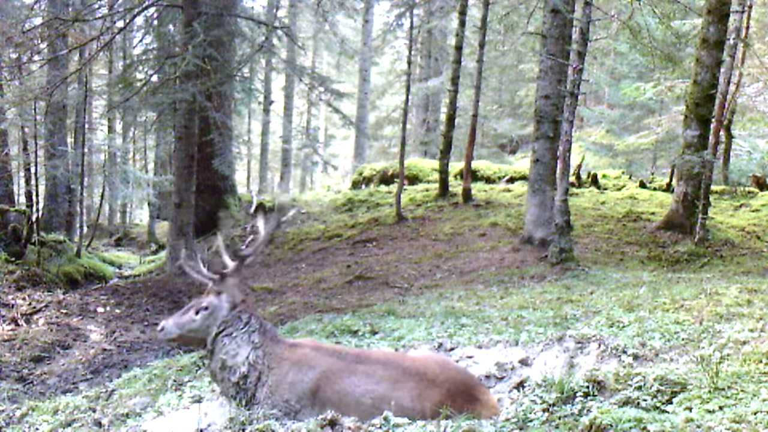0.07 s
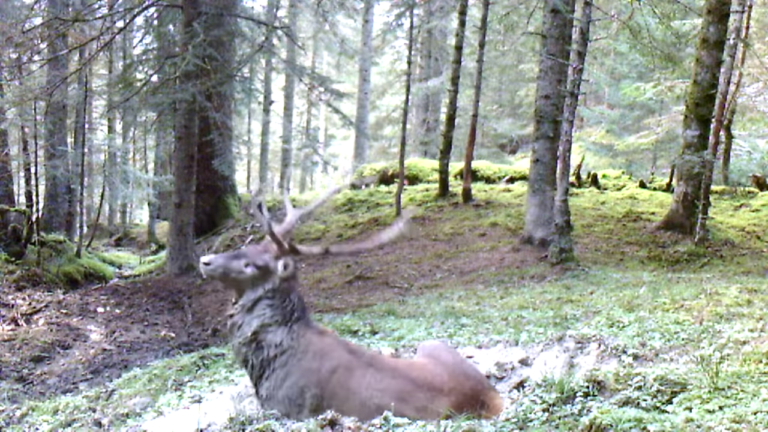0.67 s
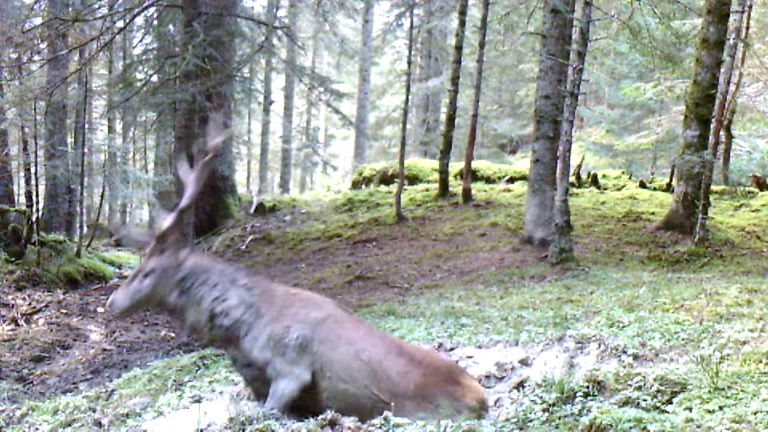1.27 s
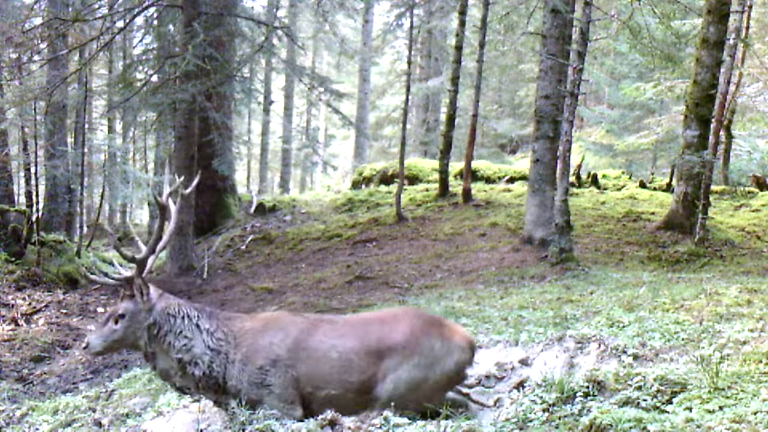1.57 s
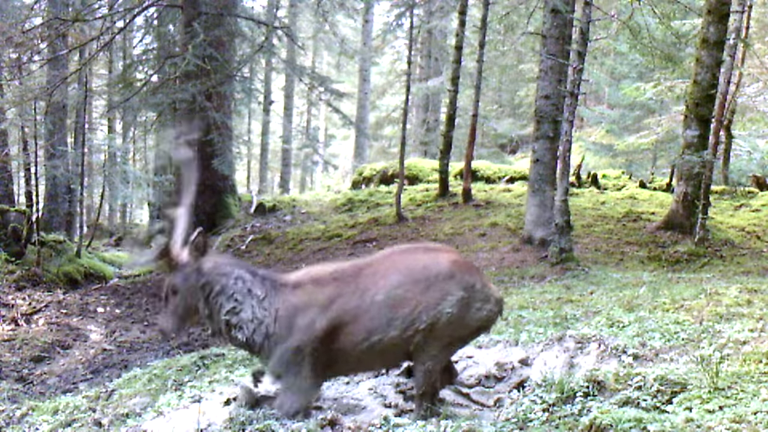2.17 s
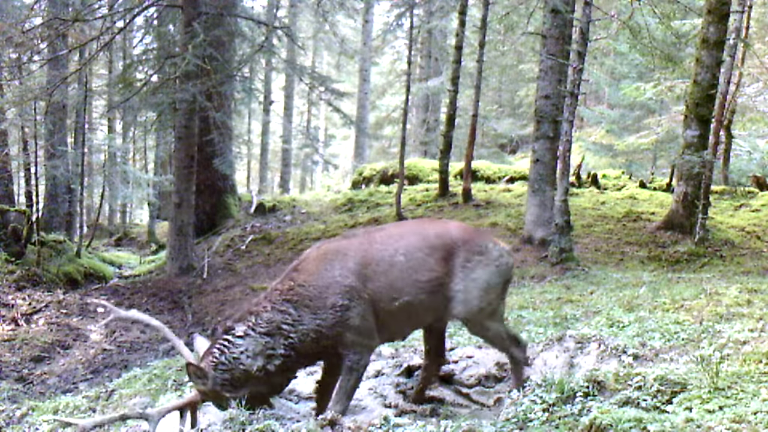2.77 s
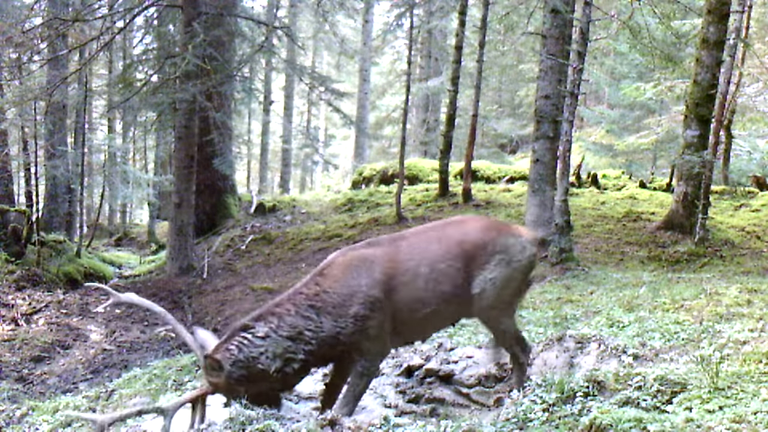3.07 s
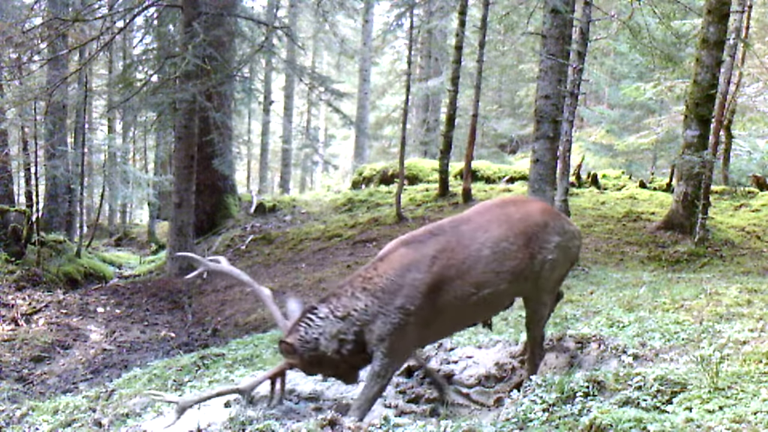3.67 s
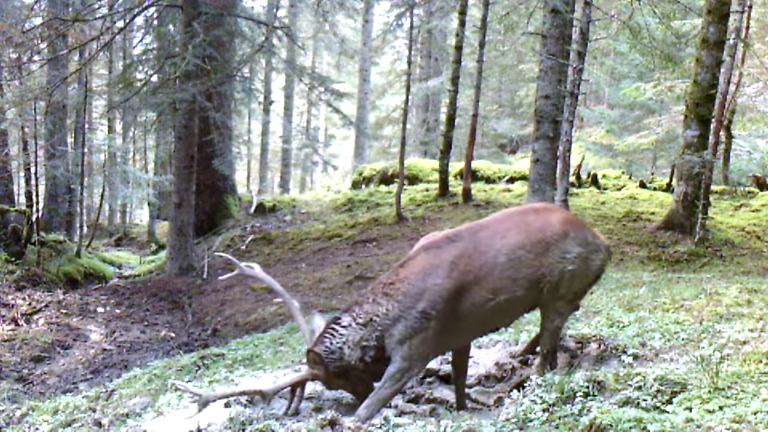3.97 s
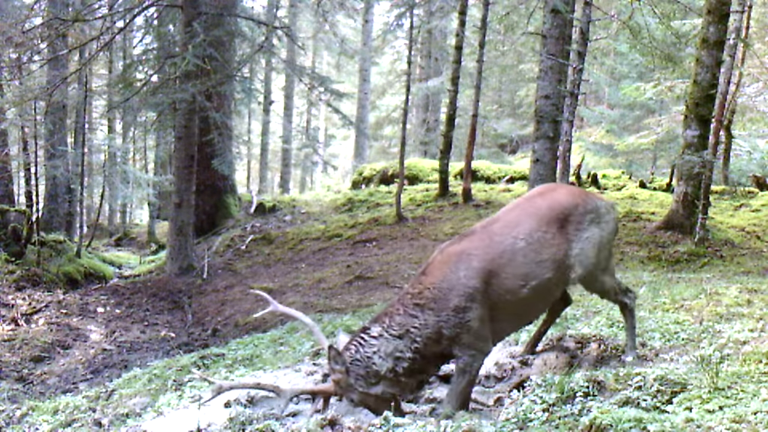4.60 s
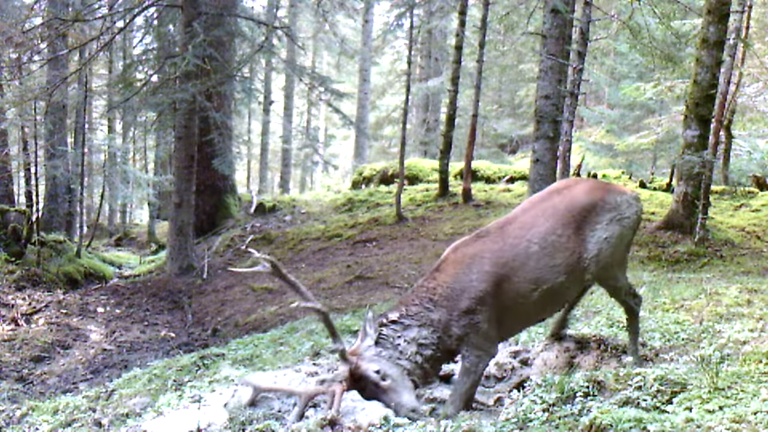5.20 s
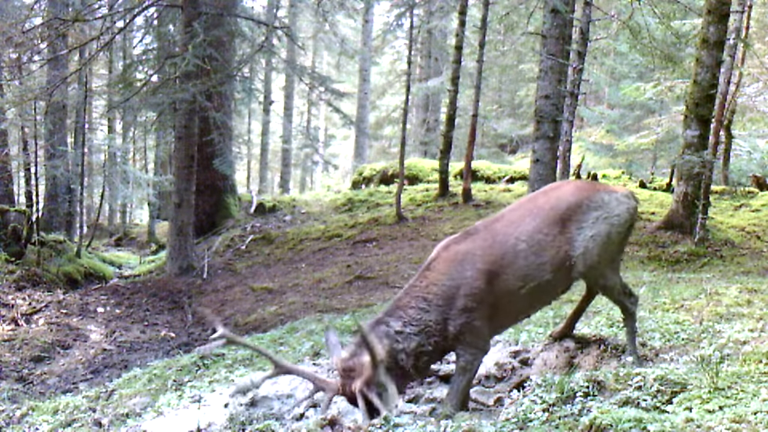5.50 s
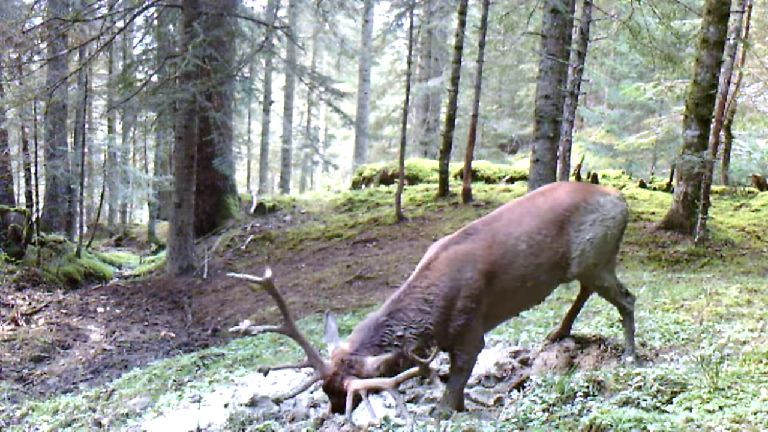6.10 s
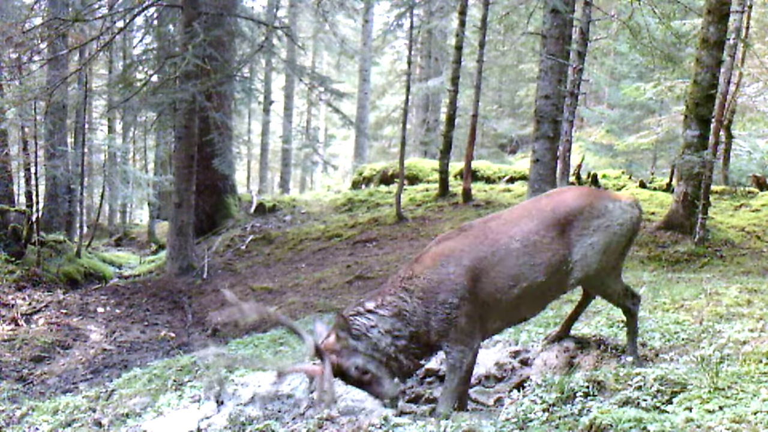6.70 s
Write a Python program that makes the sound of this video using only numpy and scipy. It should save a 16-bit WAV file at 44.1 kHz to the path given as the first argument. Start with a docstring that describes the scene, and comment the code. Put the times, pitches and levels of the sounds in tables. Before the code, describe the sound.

A stag splashes and squelches in a muddy wallow, with wet pops, drips and soft thuds over a steady hiss.

```python
"""Wet slurry rustles and drips over a steady hiss; then a stag heaves itself out of a mud wallow and
rakes it with antlers and forelegs. Trapped air resonates: swarms of tiny bubbles squelch, single
pockets pop, and legs thud into gulping holes. Ground and trunks scatter the sound of the mud, and
something rings faintly far off, perhaps a cowbell."""
import sys
import numpy as np
from scipy import signal
from scipy.fft import rfft, irfft, next_fast_len
from scipy.io import wavfile

SR = 44100
rng = np.random.default_rng(int(sys.argv[2]) if len(sys.argv) > 2 else 0)


def unload_wav(signal):
    """Save mono or channel-first audio to the path in sys.argv[1] as 16-bit WAV at rate SR, clipped to [-1, 1]."""
    wavfile.write(
        sys.argv[1],
        SR,
        np.round(np.clip(np.atleast_2d(signal).T, -1, 1) * 32767).astype(np.int16),
    )


N = 302085
TIME = np.arange(N) / SR


def undb(db):
    """Amplitude ratio of a level in decibels."""
    return 10 ** (np.asarray(db) / 20)


def unit(x):
    """Normalisation to an rms of 1."""
    return x / np.sqrt(np.mean(x ** 2) + 1e-18)


def add(out, start, sound):
    """Superposition: a sound joins the mix at start seconds."""
    i = min(max(int(start * SR), 0), len(out))
    out[i:i + len(sound)] += sound[:len(out) - i]


def colour(x, points):
    """Minimum-phase filtering through points of (frequency [Hz], gain [dB])."""
    size = 2 * next_fast_len(len(x) // 2 + 2048)
    hz, db = np.transpose(points)
    bin_hz = np.arange(size // 2 + 1) * SR / size
    gain = undb(np.interp(np.log(bin_hz + 1), np.log(hz), db))
    cepstrum = irfft(np.log(gain))
    cepstrum[1:size // 2] *= 2  # folding onto positive time makes the filter causal
    cepstrum[size // 2 + 1:] = 0
    return irfft(rfft(x, size) * np.exp(rfft(cepstrum)))[:len(x)]


def fade(t, t60):
    """Exponential damping, 60 dB down after t60 seconds."""
    return np.exp(-np.log(1000) * t / max(t60, 1e-4))


def linger(x, t60):
    """Leaky integration of power: a running rms that dies away in t60 seconds."""
    retained = fade(2 / SR, t60)
    return np.sqrt(signal.lfilter([1 - retained], [1, -retained], x ** 2 + 1e-18))


def bubble(t, hz, t60, glide):
    """Damped resonance of a cavity, whose pitch rises as it opens."""
    return np.sin(2 * np.pi * hz * t * (1 + glide * np.minimum(t / t60, 1) / 2)) * fade(t, t60)


def swarm(per_second, low_hz, high_hz, cycles, spread_db):
    """Incoherent sum of tiny bubbles bursting at random: most weak, a few strong."""
    out = np.zeros(N)
    draws = np.random.default_rng(rng.integers(2 ** 31)).random((int(per_second * N / SR) + 2, 4))
    for when, pitch, life, rank in draws:
        hz = low_hz * (high_hz / low_hz) ** pitch
        t60 = cycles * 2 ** (2 * life - 1) / hz
        gain = undb(-spread_db * np.log(rank + 0.0069)) * np.sqrt(hz / t60)
        polarity = (-1) ** int(when * N)
        t = np.arange(int(t60 * SR) + 2) / SR
        add(out, when * N / SR, polarity * gain * bubble(t, hz, t60, glide=0.058))
    return unit(out)


def hiss(level_db=-43):
    """Stationary filtered noise: a steady distant rush and hiss."""
    # noise spectrum: (frequency [Hz], relative density [dB])
    hiss_spectrum = [(20, 8.5), (30, -10), (60, -5), (130, -6), (250, -5.5), (400, -7), (520, -6),
                     (720, -12.5), (900, -13), (1300, -12), (1650, -15.5), (2300, -15), (5000, -16),
                     (6000, -27)]
    return undb(level_db) * unit(colour(rng.standard_normal(N), hiss_spectrum))


def slurry_flow(strokes, stir_db=-4, creep_db=-19.5, fallback_db=-12.5):
    """Independent motions add in power: stirring, creep before a stroke and mud falling back after."""
    # stirring between the strokes: (time [s], level [dB])
    stirring = [(0.0, -48.5), (0.42, -40), (0.88, -47.5), (1.05, -40), (1.35, -45.5), (2.56, -37.5),
                (2.84, -43), (3.13, -37.5), (3.24, -41.5), (4.31, -36), (4.54, -49.5), (4.77, -36),
                (4.92, -35.5), (5.47, -42), (6.05, -38.5), (6.68, -33.5), (6.81, -28), (6.85, -11)]
    stirred = undb(np.interp(TIME, *np.transpose(stirring)) + stir_db)
    throw_power = 0.82  # a harder stroke moves more mud, but less than in proportion
    creep = undb(creep_db) * linger(strokes[::-1], t60=0.13)[::-1] ** throw_power
    fallback = undb(fallback_db) * linger(strokes, t60=0.37) ** throw_power
    return np.sqrt(stirred ** 2 + creep ** 2 + fallback ** 2)


def slurry(flow, gain_db=-3, wash_db=-5):
    """Overlapping bubble resonances and noise merge into a rustle proportional to the flow."""
    # timbre of moving slurry: (frequency [Hz], gain [dB])
    slurry_spectrum = [(80, -34.5), (400, 1), (750, -6), (1100, -3.5), (1550, 3), (2300, -2.5), (3100, 3),
                       (3800, 0.5), (4700, 3.5), (6000, -4.5)]
    drops = swarm(per_second=1800, low_hz=700, high_hz=6000, cycles=30, spread_db=3)
    wash = undb(wash_db) * rng.standard_normal(N)
    return unit(colour(drops + wash, slurry_spectrum)) * flow * undb(gain_db)


def pops(pockets, rise_s=0.00047):
    """Impulsive excitation: air pockets tear open and ring; small ones splatter, large ones plop."""
    out, t = np.zeros(N), np.arange(SR // 16) / SR
    for start, db, hz, t60 in pockets:
        band = signal.butter(3, [min(hz * .6, 1700), min(hz * 2.2, 6000)], "band", fs=SR, output="sos")
        splat = unit(signal.sosfilt(band, rng.standard_normal(len(t))))
        decay = fade(t, t60)
        droplets = (hz / 3000) ** 1.5 * splat * decay
        pop = (bubble(t, hz * .97, t60, glide=.16) + droplets) * np.minimum(t / rise_s, 1)
        # the energy released grows with the level and the length of the ring
        add(out, start, undb(db) * unit(pop) * np.std(decay) / 2)
    return out


def drips(flow, count=150, above_flow_db=12.5, spread_db=2.5, centre_hz=2610, octaves=.45, t60=0.015):
    """Brief resonances of drops and small pockets tick at random, louder when more slurry moves."""
    times = (np.arange(count) + rng.random(count)) * N / SR / count
    strength, pitch = np.clip(rng.standard_normal((count, 2)), -2, 2).T
    db = 20 * np.log10(np.interp(times, TIME, flow)) + above_flow_db + spread_db * strength
    hz = centre_hz * 2 ** (octaves * pitch)
    return pops(zip(times, db, hz, np.full(count, t60)))


def forest(x, ground_t60=0.36, trunks_t60=0.62, echo_db=-14):
    """Scattering by ground and trunks: a filtered copy of the sound with a thin reverberant tail."""
    # response of the scattering paths: (frequency [Hz], gain [dB])
    scatter_spectrum = [(60, -7.5), (400, -2.5), (750, -13.5), (1500, -10.5), (3000, -21), (5000, -6.5)]
    out, t = x.copy(), np.arange(SR) / SR
    block = SR // 8
    # every splash happens at another spot, so each block's echoes take other paths
    for i in range(0, N, block):
        near, far = rng.standard_normal((2, SR))
        ground = unit(near * fade(t, ground_t60) * (t > .003))
        trunks = unit(far * fade(t, trunks_t60) * np.minimum(t / 0.015, 1))
        echo = undb(echo_db) * (ground + trunks) / np.sqrt(SR)
        add(out, i / SR, signal.fftconvolve(x[i:i + block], echo))
    return colour(out, scatter_spectrum)


def air_pockets():
    """Cavity resonance: the loudest pockets of trapped air burst one by one."""
    # bursts: (time [s], level [dB], nominal pitch [Hz], t60 [s])
    bursts = [(0.4987, -26.5, 2720, .013), (0.629, -22.5, 2700, 0.01), (0.67, -21, 2700, 0.0057),
              (0.8693, -21, 4030, 0.015), (1.0113, -22.5, 1490, 0.035), (1.0466, -23, 1950, 0.03),
              (1.071, -24.5, 1370, 0.037), (1.1519, -1, 4600, 0.0083), (1.1733, -19.5, 3080, 0.028),
              (1.5273, -21, 2870, 0.021), (1.5541, -16, 2210, 0.0098), (1.7416, -12.5, 3470, 0.017),
              (1.9968, -12.5, 2760, 0.043), (2.0337, -3, 3070, 0.05), (2.207, -13, 4300, 0.026),
              (2.263, -14, 4310, 0.052), (2.3367, -7, 3000, 0.0078), (2.3777, -14.5, 3730, 0.015),
              (2.5013, -16.5, 1545, 0.018), (2.5816, 1, 4830, 0.028), (3.0004, -14.5, 3550, 0.0064),
              (3.2756, -17.5, 5000, 0.028), (3.544, -9.5, 3260, 0.011), (3.5702, -4.5, 4440, .024),
              (3.689, -21.5, 4330, 0.035), (3.798, -21, 2430, .02), (3.8442, -3, 2100, 0.003),
              (4.1259, -3.5, 1770, 0.01), (4.1468, -4, 1488, .039), (4.4376, -17.5, 4840, 0.04),
              (4.491, -17.5, 3100, 0.032), (4.789, -15, 2970, 0.011), (4.9134, -5, 2630, 0.022),
              (4.96, -21, 3560, 0.054), (5.004, -21, 2660, 0.034), (5.028, -20.5, 2020, 0.017),
              (5.308, -15.5, 4820, 0.04), (5.3744, -15, 1820, 0.028), (5.4548, -24.5, 1840, 0.045),
              (5.6807, -21.5, 2930, 0.037), (5.7535, -8, 1880, 0.0083), (6.0033, -19.5, 3420, 0.02),
              (6.1318, -9, 2780, .004), (6.1393, -13, 2470, 0.019), (6.163, -14, 2420, 0.011),
              (6.2183, -20, 4660, 0.018), (6.4219, 6.5, 3030, 0.004), (6.611, -7.5, 4670, 0.016),
              (6.6895, -5, 4380, 0.033), (6.734, -14, 2820, 0.036), (6.7537, 3.5, 3300, 0.0071),
              (6.841, -5, 2020, 0.0098)]
    return pops(bursts)


def squelches(gain_db=-1, hollow_q=4.0, bypass_db=-7):
    """Stick-slip flow: pressure under a leg or antler forces air and water through the mud in jerks."""
    # mud pressed or torn: (time [s], duration [s], level [dB], relative spray [dB], hollow [Hz])
    presses = [(0.828, 0.073, -42.5, 4, 1420), (0.928, .032, -42, 2, 1650), (1.128, .032, -40.5, 3, 1820),
               (1.716, 0.042, -33.5, 8, 1900), (1.757, 0.033, -29, -2.5, 2230),
               (1.943, 0.019, -33, 4, 1180), (2.011, 0.031, -25.5, 0.5, 1400),
               (2.306, 0.065, -36, -0.5, 1630), (2.431, 0.05, -37.5, -2, 1850),
               (2.571, 0.022, -30, 3, 2000), (2.76, 0.036, -38.5, 1.5, 1840), (3.128, 0.02, -44, 10, 1840),
               (3.294, 0.037, -21.5, -6, 1250), (3.533, 0.024, -46, 13.5, 2200),
               (3.839, 0.017, -22.5, -4.5, 1420), (4.016, 0.093, -46.5, 13, 1600),
               (4.108, 0.034, -27, 3.5, 1990), (4.146, .016, -20.5, -9, 1570),
               (4.362, 0.043, -31.5, 2.5, 1600), (4.464, 0.021, -24.5, 1.5, 1600),
               (4.837, 0.012, -29, -7, 1410), (5.075, 0.0367, -38, 6, 1770), (5.363, 0.027, -38, 2, 1820),
               (5.791, 0.054, -34.5, -2, 1540), (6.082, 0.074, -37, 0.5, 2020),
               (6.4, 0.0293, -27.5, 0.5, 1590), (6.598, 0.0085, -18.5, 2.5, 1330),
               (6.661, 0.059, -38.5, 10, 2100), (6.757, 0.011, -18, 2, 1710),
               (6.771, 0.029, -26.5, 4, 1740), (6.805, 0.0247, -16.5, 0.5, 1580)]
    # timbre of the coarse bubbles: (frequency [Hz], gain [dB])
    body_spectrum = [(80, -13), (300, 1), (700, -11), (1000, -4), (1450, -4.5), (2100, -3), (3000, -14.5),
                     (5000, -27.5)]
    # timbre of the fine spray: (frequency [Hz], gain [dB])
    spray_spectrum = [(900, -32), (1900, -17.5), (2900, 5.5), (3800, 1), (4700, 5), (6000, -8.5)]
    coarse = swarm(per_second=1900, low_hz=400, high_hz=3500, cycles=22, spread_db=2.7)
    fine = swarm(per_second=3200, low_hz=1800, high_hz=6500, cycles=24, spread_db=3)
    body, spray = colour(coarse, body_spectrum), colour(fine, spray_spectrum)
    slip_times = np.linspace(0, N / SR, N // 150)  # a few milliseconds apart
    slips = undb(1.8 * np.interp(TIME, slip_times, rng.standard_normal(len(slip_times))))
    out = np.zeros(N)
    for start, length, db, spray_db, hollow_hz in presses:
        span = slice(int(start * SR), min(int((start + length) * SR) + SR // 600, N))
        progress = np.linspace(0, 1, span.stop - span.start)
        push = slips[span] * np.interp(progress, [0, .05, .5, .85, 1], [0, .65, 1, .6, 0])
        # the hollow in the mud gives each squelch a formant, which falls as the hollow widens
        formant = signal.lfilter(*signal.iirpeak(hollow_hz, hollow_q, fs=SR), body[span])
        vowel = formant + undb(bypass_db) * body[span]
        falling = np.interp(progress * (1 + .14 * (1 - progress)), progress, vowel)
        squelch = unit(push * falling) + undb(spray_db) * unit(push * spray[span])
        add(out, start, undb(db + gain_db) * squelch)
    return out


def thuds(rise_s=0.0016, gulp_db=-4.5, slosh_db=-6, ground_db=2, ground_hz=130):
    """Impact and cavity resonance: a leg plunges, its hole gulps, mud sloshes, soft ground thumps."""
    # legs and body plunging: (time [s], level [dB], cavity [Hz], thump level [dB], slosh t60 [s])
    plunges = [(0.843, -20, 256, -34, 0.18), (0.998, -22.5, 299, -41, 0.075), (1.172, -18, 340, -45, 0.027),
               (1.552, -13.5, 530, -48, 0.056), (1.688, -23, 248, -47, .04), (1.74, -24, 497, -41, 0.051),
               (1.769, -10, 409, -36, 0.1), (2.034, -11, 268, -31, 0.091), (2.335, -24, 362, -42, 0.1),
               (2.397, -25.5, 210, -34, 0.15), (2.425, -25, 280, -31.5, 0.28),
               (2.581, -25, 328, -44, 0.097), (2.62, -25, 306, -34.5, 0.074), (2.766, -24, 416, -38, .12),
               (3.303, -21.5, 287, -28, 0.18), (3.535, -19.5, 205, -33, 0.077),
               (3.794, -20.5, 450, -34.5, 0.21), (3.844, -19.5, 210, -44.5, 0.12),
               (4.117, -24, 190, -41.5, 0.092), (4.146, -16.5, 199, -31.5, 0.14),
               (4.39, -23.5, 420, -30.5, .1), (4.469, -18, 380, -45, 0.035), (4.842, -23, 250, -59, 0.099),
               (4.891, -22.5, 330, -58, 0.079), (5.375, -28, 278, -44, .05), (5.75, -19, 300, -35.5, 0.11),
               (5.819, -22, 303, -38, 0.093), (6.597, -26, 266, -48, 0.037), (6.756, -22, 320, -31, 0.092),
               (6.796, -12, 350, -41, 0.077), (6.815, -8, 333, -43, 0.076)]
    gulp_t60, gulp_gap_s, pitch_ratio = 0.029, .015, .86
    out, t = np.zeros(N), np.arange(SR // 7) / SR
    slosh_band = signal.butter(3, [120, 520], "band", fs=SR, output="sos")
    attack = np.minimum(t / rise_s, 1)
    for start, db, hz, thump_db, slosh_t60 in plunges:
        gain = undb(db + gulp_db)
        slosh = unit(signal.sosfilt(slosh_band, rng.standard_normal(len(t)))) * fade(t, slosh_t60)
        gulp = bubble(t, hz, gulp_t60, glide=0.08) + undb(slosh_db) * slosh
        thump = bubble(t, ground_hz * np.exp(0.1 * rng.standard_normal()), t60=0.062, glide=0)
        add(out, start, (gain * gulp + undb(thump_db + ground_db) * thump) * attack)
        for k in (1, 2):  # each further gulp is lower in pitch and fades with the slosh
            delay = gulp_gap_s * (k + rng.uniform(-.25, .25))
            after_gulp = bubble(t, hz * pitch_ratio ** k, gulp_t60, glide=.12) * attack
            add(out, start + delay, gain * fade(delay, slosh_t60) * after_gulp)
    return out


def far_bell(rise_s=0.0052):
    """Modal vibration: a few soft strokes ring out, their attack blurred by distance."""
    # strokes of the bell: (time [s], level [dB])
    strikes = [(2.915, -52.5), (3.541, -53.5), (4.833, -55), (5.488, -56.5)]
    # its modes: (frequency [Hz], relative level [dB], t60 [s])
    bell_modes = [(463, 4, 1.6), (1004, 6, 1.75), (1000, -21.5, 1.0), (1640, -25, .7)]
    ring = sum(undb(db) * np.sin(2 * np.pi * hz * TIME) * fade(TIME, t60) for hz, db, t60 in bell_modes)
    out = np.zeros(N)
    for start, db in strikes:
        add(out, start, undb(db) * ring * np.minimum(TIME / rise_s, 1))
    return out


def scene():
    """Superposition, in mono, of the wallow, its scattered sound, the bell and the hiss."""
    strokes = squelches() + air_pockets()
    flow = slurry_flow(strokes)
    mud = strokes + thuds() + slurry(flow) + drips(flow)
    return (mud + forest(mud) + far_bell() + hiss())[None]


def record(dry, ceiling=0.78, mic_top_hz=5510, cutoff_hz=16400):
    """Band limiting and soft saturation: a narrow-band recorder flattens the loudest peaks."""
    mic_lowpass = signal.cheby1(10, .2, mic_top_hz, fs=SR, output="sos")
    output_lowpass = signal.ellip(8, .2, 70, cutoff_hz, fs=SR, output="sos")
    narrow = signal.sosfilt(mic_lowpass, dry)
    clipped = narrow / (1 + (narrow / ceiling) ** 10) ** .1
    return signal.sosfilt(output_lowpass, clipped)


dry = scene()
out = record(dry)
unload_wav(out)
```